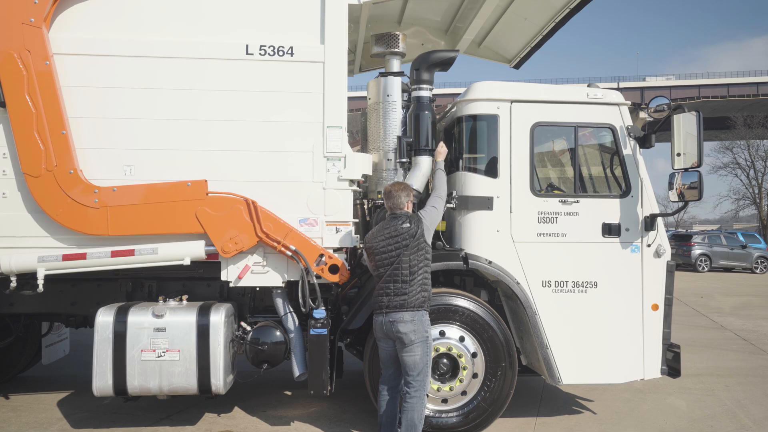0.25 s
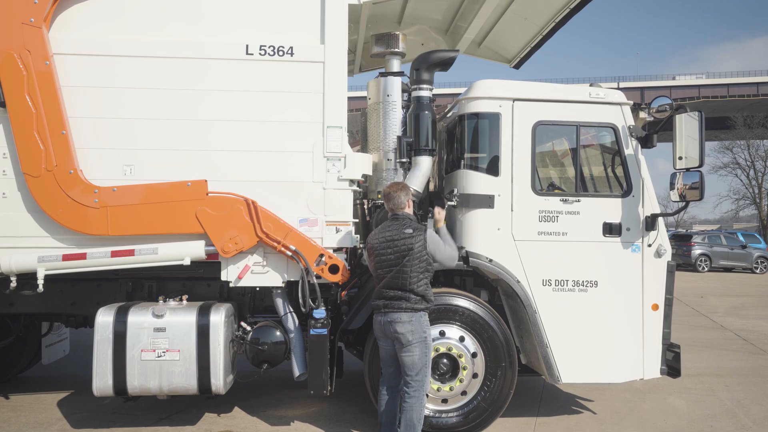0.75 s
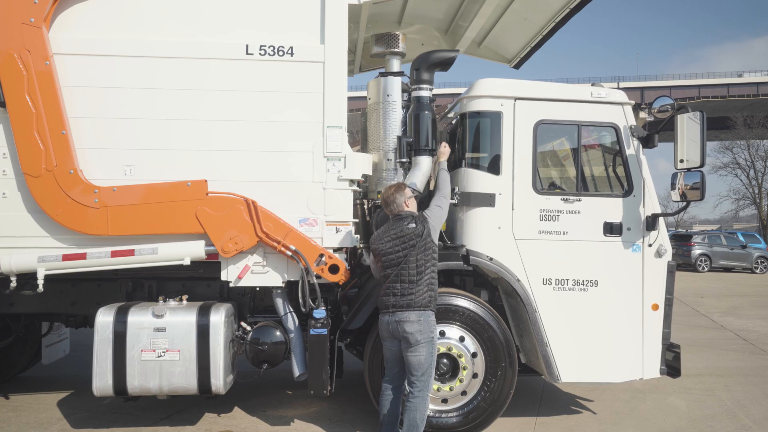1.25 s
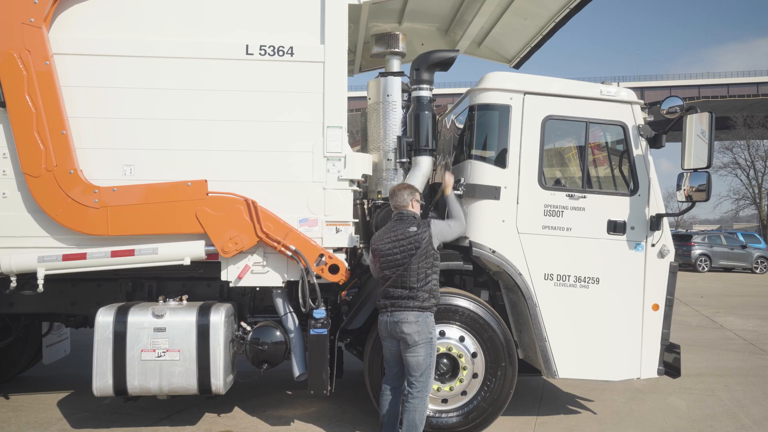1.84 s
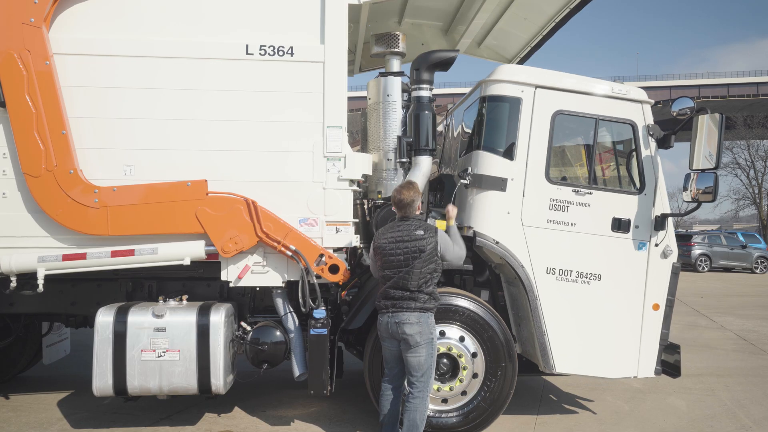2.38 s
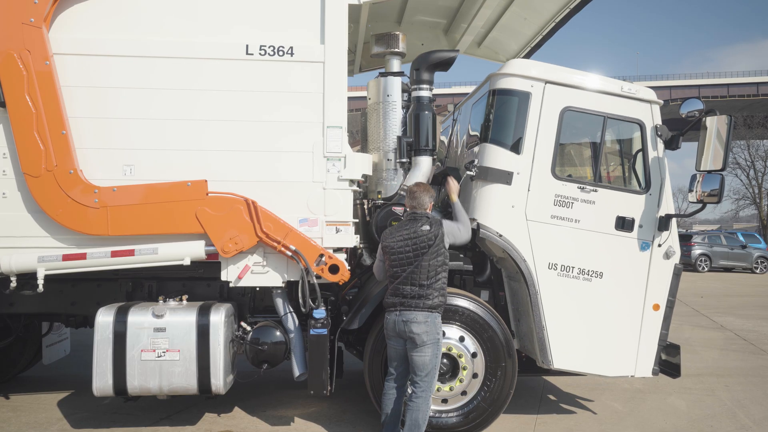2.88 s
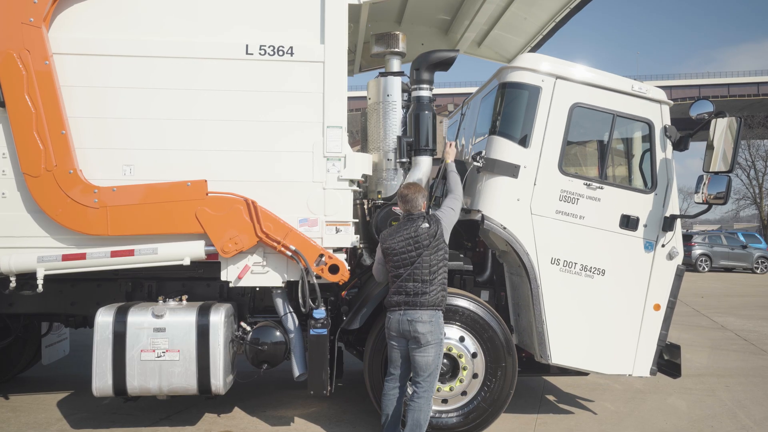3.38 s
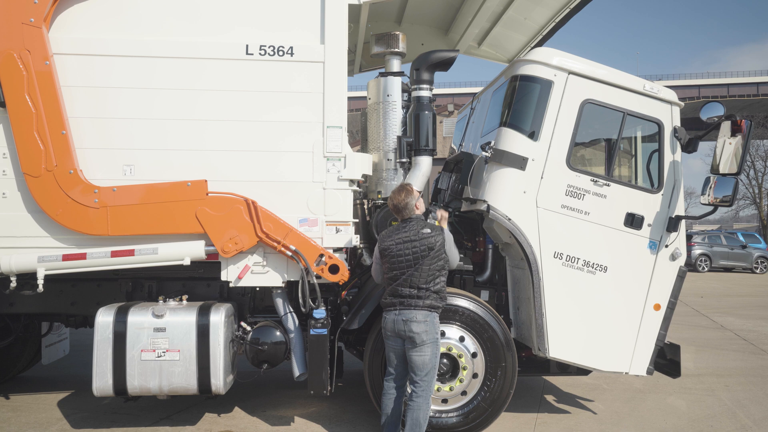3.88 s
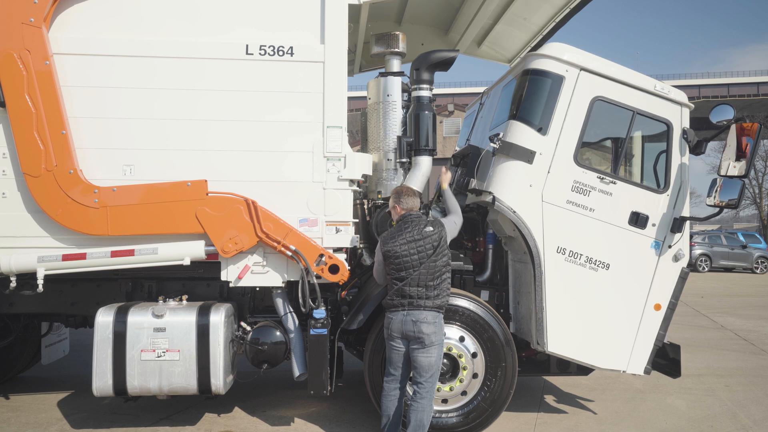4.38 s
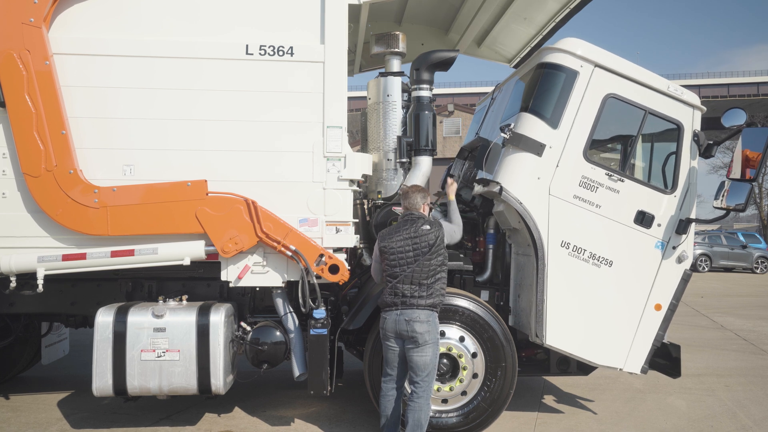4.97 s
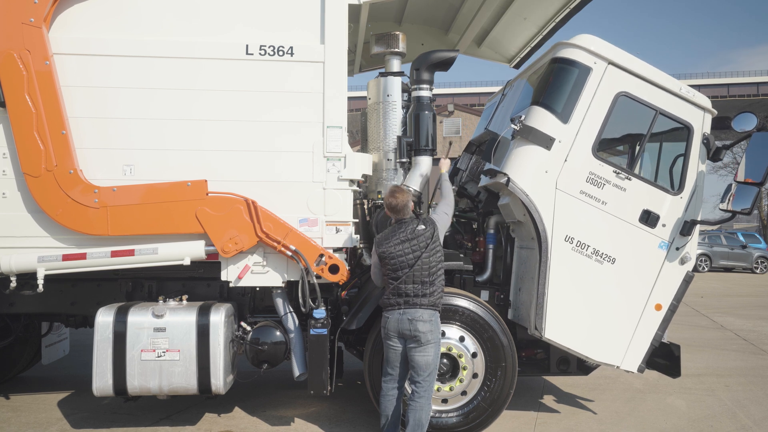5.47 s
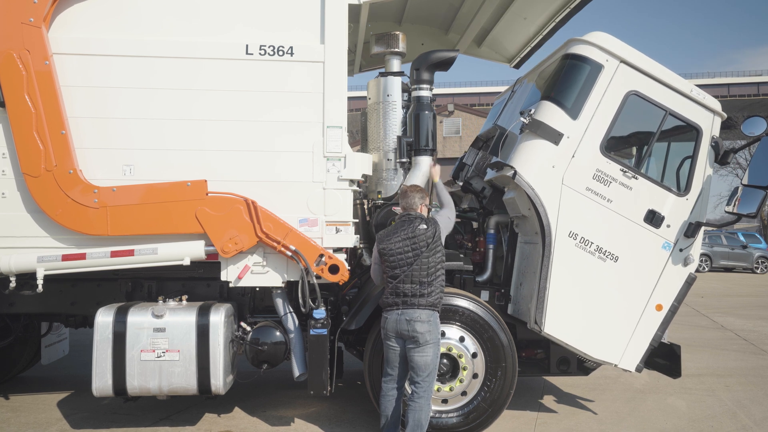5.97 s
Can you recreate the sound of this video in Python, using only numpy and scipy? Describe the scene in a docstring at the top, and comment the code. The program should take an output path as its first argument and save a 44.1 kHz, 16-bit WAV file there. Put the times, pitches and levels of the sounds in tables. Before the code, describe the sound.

A hydraulic hand pump on a truck is worked steadily for about six seconds in an open yard. Its steel lever strikes two stops in turn. The lower stop gives a snap with a hollow clang right at the start, then near 0.9, 1.6, 2.3, 3.0, 3.7, 4.3, 5.0 and 5.7 seconds. The upper stop gives a louder, brighter crack with a short rattle and a thump in the chassis near 0.4, 1.2, 2.0, 2.6, 3.3, 4.0, 4.6, 5.3 and 6.0 seconds. The pace quickens slightly over the first two seconds, then holds. Between knocks the loose lever clicks and scrapes in its socket, the linkage clinks, and the pivot makes tiny high squeaks. Oil hisses faintly with each stroke, with thin, high valve whistles near 1.9, 2.5 and 3.2 seconds. The knocks leave a faint, dull echo, and quiet distant traffic rumbles throughout.

```python
"""Hand pump tilting a truck cab

In an open yard, a steel lever knocks against its lower and upper stop in turn, each knock blooming
in the chassis. Between knocks the loose lever clicks and scrapes in its socket, the pivot squeaks,
the linkage clinks and oil hisses through the valves, over a distant traffic rumble."""
import sys
import numpy as np
from scipy import signal
from scipy.fft import rfft, irfft, next_fast_len
from scipy.io import wavfile

SR = 44100
rng = np.random.default_rng(int(sys.argv[2]) if len(sys.argv) > 2 else 0)


def to_wav(sig):
    """Store sig (one row per channel, or 1-D mono) as 16-bit WAV at the path in sys.argv[1].

    Samples outside -1..1 are clipped; the rate is SR.
    """
    pcm = np.clip(np.atleast_2d(sig), -1, 1) * 32767
    pcm = np.round(pcm).astype(np.int16)
    wavfile.write(sys.argv[1], SR, pcm.T)  # frames by channels


N = 274743
TIME = np.arange(N) / SR

# Lever hits on the lower stop; each layer trims these levels (time [s], crack [dB], frame thump [dB],
# panel clonk [dB], clang [dB], slip lead [s], slip [dB], seating delay [s])
LOWER_HITS = [(0.0175, -20.5, -55, -37.5, -25, 0.028, -70, 0.0045),
              (0.8566, -17.5, -77, -38, -28, 0.045, -31.5, 0.0033),
              (1.6326, -16, -48, -36.5, -24.5, 0.039, -29.5, 0.0021),
              (2.3305, -19.5, -35, -33.5, -28.5, 0.032, -26, 0.0016),
              (2.983, -21.5, -39, -28.5, -22.5, 0.035, -29, 0.018),
              (3.675, -25, -41, -39.5, -28.5, 0.043, -36, 0.009),
              (4.3125, -25, -39.5, -36.5, -24, 0.029, -29, 0.0126),
              (4.9801, -26, -38.5, -30, -23, 0.024, -29.5, 0.013),
              (5.6885, -23.5, -39.5, -35, -25, 0.033, -45, 0.018)]
# Lever hits on the upper stop, trimmed likewise (time [s], crack [dB], first touch [dB],
# frame thump [dB], panel clonk [dB], play click lead [s], play click [dB])
UPPER_HITS = [(0.4122, -13, -27.5, -32.5, -28, 0.057, -39), (1.2321, -16, -19, -33.5, -27.5, 0.058, -44.5),
              (1.9696, -12.5, -27.5, -26, -30.5, 0.045, -39.5),
              (2.643, -10.5, -22.5, -26.5, -29.5, 0.046, -42),
              (3.304, -14.5, -25.5, -25.5, -28.5, 0.044, -39.5),
              (3.976, -15, -28.5, -30.5, -28.5, 0.04, -39.5),
              (4.629, -15.5, -29.5, -27, -29.5, 0.0352, -42.5), (5.3184, -15, -29, -26, -29, 0.047, -41),
              (6.0257, -16, -31, -27.5, -31.5, 0.049, -43.5)]
# Chassis modes (pitch [Hz], upper-stop gain [dB], lower-stop gain [dB], t60 [s], build-up [s])
CHASSIS_MODES = [(162, -1.5, -14, 0.06, 0.01), (187, -12.5, -28, 0.33, 0.054),
                 (213.2, -1.5, -0.5, 0.11, 0.026), (241.4, -27.5, -6, 0.14, 0.045),
                 (309.2, -25.5, -13.5, 0.11, 0.14), (357.1, -14.5, -13, 0.11, 0.046),
                 (490.3, -5.5, 1, 0.16, 0.0086), (530.5, -17, -9.5, 0.17, 0.03),
                 (647.3, -9.5, -7, 0.16, 0.0044), (690.6, -21.5, -17.5, 0.21, 0.0054),
                 (779, -12.5, -12.5, 0.16, 0.0093), (889.4, -15.5, -13.5, 0.11, 0.023),
                 (1200, 3, -12.5, 0.057, 0.0029)]
# Resonances of the lever, its socket and the rattling linkage (centre [Hz], width [Hz], boost [dB])
LEVER_PEAKS = [(2630, 780, 5.5), (2926, 240, 2), (3240, 99, 1), (3930, 280, 3.5), (5010, 280, 3.5),
               (9200, 160, 7.5)]
SOCKET_PEAKS = [(5460, 120, 10), (8600, 230, 4.5), (10450, 290, 8.5), (11700, 390, 6)]
RATTLE_PEAKS = [(2560, 280, 7.5), (3180, 130, 14.5), (4870, 100, 4.5)]
# EQ curves of bright steel hits and of hollow panels (frequency [Hz], relative level [dB])
BRIGHT_EQ = [(700, -7.5), (1700, -7), (2600, -6), (4500, 1), (7300, 0.5), (8300, 0), (11000, 10.5),
             (13500, 5.5), (16000, 4)]
PANEL_EQ = [(150, -33.5), (230, 5), (520, 8), (850, -1.5), (1250, -1), (1600, -10.5), (5000, -20)]

GRAZE_S = 0.011   # the lever grazes the lower stop this long before it lands
BOUNCE_S = 0.0095   # each click of the play bounces once, this much later
CHINK_HZ = (8400, 13400)   # range in which the small joints ping


def from_db(db):
    """Decibels to gain."""
    return 10 ** (np.asarray(db) / 20)


def noise():
    """White noise, rms 1."""
    return rng.standard_normal(N)


def grit(spread_db):
    """Noise of many tiny contacts of uneven size, rms 1."""
    grains = noise() * from_db(spread_db * np.clip(noise(), -2, 2))
    return grains / grains.std()


def flicker(spread_db, per_s):
    """A gain that jumps about at random, so many times a second."""
    return from_db(spread_db * np.interp(TIME * per_s, np.arange(N), np.clip(noise(), -2, 2)))


def colour(x, eq, peaks=()):
    """Causal EQ: a smooth curve plus resonance peaks; white noise keeps its level."""
    size = 2 * next_fast_len(N // 2 + SR // 4)
    hz = np.maximum(np.arange(size // 2 + 1) * SR / size, 1)
    points = np.array(eq)
    db = np.interp(np.log(hz), np.log(points[:, 0]), points[:, 1])
    for centre, width, height in peaks:
        db = db + height / (1 + (2 * (hz - centre) / width) ** 2)
    gain = from_db(db)
    cepstrum = irfft(np.log(gain / np.sqrt(np.mean(gain ** 2))))
    cepstrum[1:size // 2] *= 2   # minimum phase: no ringing ahead of a hit
    cepstrum[size // 2 + 1:] = 0
    return irfft(rfft(x, size) * np.exp(rfft(cepstrum)))[:N]


def pitched_noise(hz, width_hz):
    """Noise in one resonance, rms 1."""
    radius = np.exp(-np.pi * width_hz / SR)
    band = signal.lfilter([1, 0, -1], [1, -2 * radius * np.cos(2 * np.pi * hz / SR), radius ** 2], noise())
    return band / band.std()


def swell(build_s, t60):
    """Half a second of an envelope that builds up and dies away, peak 1."""
    t = TIME[:SR // 2]
    shape = (1 - np.exp(-(t / build_s) ** 2)) * from_db(-60 * t / t60)
    return shape / shape.max()


def place(times, levels_db, shape):
    """One copy of a shape at each time, at its level."""
    out = np.zeros(N)
    for s, gain in zip(times, from_db(levels_db)):
        start = int(s * SR)
        if 0 <= start < N:
            out[start:start + len(shape)] += gain * shape[:N - start]
    return out


def strike_envelope(times, levels_db, build_s, t60):
    """The joint envelope of blows, each with its own build-up and decay."""
    blows = np.broadcast(times, levels_db, build_s, t60)
    return sum(place([s], [db], swell(build, decay)) for s, db, build, decay in blows)


def contact(times, body_db, treble_db, build_s, t60, split_hz=7500):
    """Steel chatters on steel: a gritty burst with separate body and treble levels."""
    force = grit(spread_db=3.5)
    body = signal.sosfilt(signal.butter(4, split_hz, "low", fs=SR, output="sos"), force)
    treble = signal.sosfilt(signal.butter(4, split_hz, "high", fs=SR, output="sos"), force)
    body *= strike_envelope(times, body_db, build_s, t60)
    treble *= strike_envelope(times, treble_db, build_s, t60)
    return body + treble


def bounces(times, levels_db, gap_s, loss_db, count, vary_db=2):
    """Each touch starts a short, uneven run of bounces: their times and levels."""
    bounce = np.arange(count)
    late, size = rng.standard_normal((2, len(times), count))
    s = times[:, None] + gap_s * (bounce + 0.18 * late * (bounce > 0))
    db = levels_db[:, None] - loss_db * bounce + vary_db * size
    return s.ravel(), db.ravel()


def steel(force, ring_db, t60=0.014, count=170):
    """Many fine modes of the lever and its linkage ring on after each contact."""
    t = TIME[:SR // 5]
    hz = np.linspace(1500, 15500, count) + rng.uniform(-100, 100, count)
    ring = rng.standard_normal(count) @ np.sin(2 * np.pi * hz[:, None] * t) * from_db(-60 * t / t60)
    return force + from_db(ring_db) * signal.fftconvolve(force, ring / np.linalg.norm(ring))[:N]


def pings(times, levels_db, low_hz, high_hz, t60, count=4):
    """The point of contact shifts, so each touch rings a few different modes."""
    t, shape = TIME[:SR // 2], swell(0.00057, t60)
    pitches = rng.uniform(low_hz, high_hz, (len(times), count))
    rings = (shape * np.sin(2 * np.pi * hz[:, None] * t).sum(0) for hz in pitches)
    return sum(place([s], [db], ring) for s, db, ring in zip(times, levels_db, rings))


def chassis(times, blows_db, modes_db, vary_db=3.5):
    """A blow spreads through the frame, so its modes bloom; load detunes them, the high ones most."""
    out, t = np.zeros(N), TIME[:SR // 2]
    for (hz, _, _, t60, build_s), mode_db in zip(CHASSIS_MODES, modes_db):
        register = np.searchsorted([280, 580], hz)   # blows_db holds low, mid and high levels
        shape = swell(build_s, t60)
        variations = rng.standard_normal((len(times), 3))
        for s, blow_db, (softer, shift, phase) in zip(times, blows_db[register], variations):
            detuned_hz = hz * (1 + 1.3e-5 * hz * shift)
            mode = shape * np.sin(2 * np.pi * (detuned_hz * t + phase))
            out += place([s], [blow_db + mode_db - vary_db * softer], mode)
    return out


def traffic(level_db=-50.5):
    """A steady bed of far-off traffic rumble."""
    # Rumble EQ (frequency [Hz], relative level [dB])
    rumble_eq = [(20, -22), (40, -9), (66, 3), (95, -3.5), (165, -2), (280, -12.5), (720, -17),
                 (1600, -29.5), (3000, -34.5), (7000, -41.5)]
    return from_db(level_db) * colour(noise(), rumble_eq)


def lower_stop(cushion_db_per_s=266):
    """Cushioned by oil, the lever lands and snaps into its seat; the frame gives a hollow clang."""
    # Landing EQ (frequency [Hz], relative level [dB])
    landing_eq = [(1000, -15.5), (1700, -5.5), (2100, -9), (2800, -5), (5500, -4.5), (6600, -16),
                  (8500, -4.5), (10500, 1), (16000, 1)]
    s, crack_db, thump_db, clonk_db, clang_db, _, slip_db, seat_s = np.transpose(LOWER_HITS)
    graze = contact(s - GRAZE_S, crack_db - 14, slip_db - 9, 0.0012, t60=0.04)
    # the longer the oil holds the lever back, the longer it grinds and the softer it seats
    landing = contact(s, crack_db + 2, crack_db - 10, 0.00067, t60=0.062 + 2.8 * seat_s)
    snap_db = crack_db + 7.5 - cushion_db_per_s * seat_s
    snap = contact(s + seat_s, snap_db, snap_db - 10, 0.00089 + seat_s / 10, t60=0.02)
    panels = colour(noise() * place(s, clang_db - 13, swell(0.014, 0.16)), PANEL_EQ, [(200, 310, -2.5)])
    frame = chassis(s + seat_s / 2, [thump_db, clonk_db + 1, clang_db - 7], np.array(CHASSIS_MODES)[:, 2])
    lever = colour(steel(graze + landing + snap, ring_db=-38), landing_eq, LEVER_PEAKS)
    return lever + panels + frame


def socket(loose_s=0.0364, judder_s=0.011):
    """The loose lever clicks, slips, scrapes and knocks in its socket."""
    # Stray mid-stroke clicks (time [s], body [dB], treble [dB])
    stray_clicks = [(3.5694, -30.5, -39), (5.603, -52, -48)]
    # Dull handle knocks (time [s], level [dB])
    handle_knocks = [(0.775, -46), (1.128, -40.5), (2.259, -43.5), (3.93, -45)]
    # Click and scrape EQ (frequency [Hz], relative level [dB])
    click_eq = [(1400, -9), (2700, 2), (5400, 1.5), (6600, -8.5), (9000, -3.5), (11500, 2), (16000, -0.5)]
    scrape_eq = [(400, -21.5), (510, 25), (700, 9), (1400, -6), (2700, -6), (5400, -2.5), (6600, -20),
                 (8600, -8.5), (16000, -7.5)]
    # before the upper stop, the play is taken up with a click and a bounce
    upper_s, *_, play_lead_s, play_db = np.transpose(UPPER_HITS)
    play = contact(upper_s - play_lead_s, play_db - 17, play_db, 0.002, t60=0.051)
    bounce = contact(upper_s - play_lead_s + BOUNCE_S, play_db - 11, play_db, 0.001, t60=0.13)
    # before the lower stop, the lever ticks loose, then slips in ringing jerks
    lower_s, *_, slip_lead_s, slip_db, _ = np.transpose(LOWER_HITS)
    slip_s = lower_s - slip_lead_s
    tick_s, tick_db = bounces(slip_s - loose_s, np.full(len(slip_s), -48), 0.016, loss_db=7.5, count=2)
    loose = contact(tick_s, tick_db, tick_db - 1, 0.0015, t60=0.038)
    jerk_s, jerk_db = bounces(slip_s, slip_db - 7, judder_s, loss_db=1.5, count=3)
    slip = contact(jerk_s, jerk_db - 7, jerk_db, 0.0008, t60=0.021)
    chirps = pings(jerk_s, jerk_db - 7, *CHINK_HZ, t60=0.035, count=3)
    strays = contact(*np.transpose(stray_clicks), 0.00091, t60=0.031)
    pressure = sum(np.interp(TIME - s, [-0.085, -0.005, 0.006], [0, 1, 0]) ** 2 for s in lower_s)
    friction = from_db(-46) * pressure * flicker(spread_db=0.5, per_s=300) * noise()
    scrape = colour(steel(friction, ring_db=-2, t60=0.072), scrape_eq, LEVER_PEAKS + SOCKET_PEAKS)
    thuds = noise() * place(*np.transpose(handle_knocks), swell(0.0013, 0.18))
    knocks = colour(thuds, PANEL_EQ, [(506, 63, 16.8), (1200, 250, 7.5)])
    clicks = steel(play + bounce + loose + slip + strays, ring_db=-9.5, t60=0.073)
    return colour(clicks, click_eq, LEVER_PEAKS + SOCKET_PEAKS) + chirps + scrape + knocks


def pivot(slip_hz=8720, graze_hz=8100):
    """Brief, rough stick-slip squeaks: a falling pair before each lower stop, and a few on their own."""
    # Lone squeaks and groans (time [s], pitch [Hz], level [dB], nominal length [s])
    lone_squeaks = [(0.547, 1280, -58.5, 0.093), (0.756, 2670, -50, 0.032), (1.526, 2660, -51.5, 0.033),
                    (3.268, 12900, -33.5, 0.012), (3.568, 12700, -32, 0.017), (4.905, 5400, -52.5, 0.025),
                    (5.616, 5500, -55, 0.015)]
    pairs = [(s - lead_s, hz, slip_db - 11, slip_lead_s / 2)
             for s, *_, slip_lead_s, slip_db, _ in LOWER_HITS
             for lead_s, hz in ((slip_lead_s, slip_hz), (GRAZE_S, graze_hz))]
    out = np.zeros(N)
    for s, hz, db, length in pairs + lone_squeaks:
        envelope = np.interp(TIME - s, [0, 0.003, length / 2, length * 1.3], [0, 1, 1, 0])
        out += from_db(db) * pitched_noise(hz, width_hz=170) * envelope
    return out


def linkage(clang_hz=(2513, 5584)):
    """Each stop rings the lever; loose joints clink and rattle, and ping as the play is taken up."""
    # Clinks of the loose joints (time [s], level [dB])
    joint_clinks = [(0.483, -43.5), (1.289, -39.5), (1.564, -40), (2.036, -36.5), (2.098, -41),
                    (2.26, -38.5), (2.7, -39), (2.931, -40), (3.365, -39.5), (4.05, -38.5), (4.688, -36),
                    (5.381, -37), (5.746, -45.5), (6.086, -34)]
    upper_s, *_, play_lead_s, play_db = np.transpose(UPPER_HITS)
    stop_s, crack_db = np.transpose([hit[:2] for hit in UPPER_HITS + LOWER_HITS])
    ring = pings(stop_s, crack_db - 21.5, *clang_hz, t60=0.05, count=10)
    play = pings(upper_s - play_lead_s + BOUNCE_S, play_db - 4.5, *CHINK_HZ, t60=0.046)
    s, db = bounces(*np.transpose(joint_clinks), gap_s=0.0091, loss_db=4, count=5)
    touches = contact(s, db - 4.5, db - 8.5, 0.001, t60=0.06)
    clinks = colour(touches, BRIGHT_EQ, LEVER_PEAKS + SOCKET_PEAKS + RATTLE_PEAKS)
    return ring + play + clinks + pings(s, db - 10.5, *CHINK_HZ, t60=0.039)


def flow(from_hits, to_hits, hiss, end_lead_s, fade_s=0.076):
    """Hiss envelope: oil flows from each stop until the lever slows before the opposite one."""
    ends = np.array([s - end_lead_s for s, *_ in to_hits] + [np.inf])
    ramps = (np.minimum(TIME - s, ends[ends > s][0] - TIME) / fade_s for s, *_ in from_hits)
    running = sum(np.clip(ramp, 0, 1) ** 2 for ramp in ramps)
    return running * from_db(np.interp(TIME, *np.transpose(hiss)))


def oil():
    """Oil sizzles during each stroke, and on some return strokes the inlet valve sings."""
    # Hiss as oil is drawn in and pressed out (time [s], level [dB])
    draw_hiss = [(0.201, -61.5), (.29, -70), (.9, -64), (1.08, -57), (1.12, -69), (1.799, -66), (3.15, -70),
                 (4.45, -59.5), (5.149, -57.5), (5.8, -63.5), (5.9, -68)]
    press_hiss = [(.53, -60.5), (.68, -55), (1.4, -57), (2.15, -53), (2.8, -58), (3.45, -64.5),
                  (4.1, -59.5), (4.75, -60), (5.45, -65), (6.1, -57.5)]
    # Hiss EQ (frequency [Hz], relative level [dB])
    hiss_eq = [(1500, -6.5), (3000, 0.5), (5200, 4.5), (6600, 1), (10500, 7.5), (16000, -1)]
    # Swells of the singing inlet valve (peak time [s], level [dB], half length [s])
    valve_swells = [(1.85, -55.5, 0.042), (2.525, -48, 0.028), (3.193, -50.5, 0.03)]
    sizzle = grit(spread_db=5) * flicker(spread_db=2.5, per_s=150)
    drawing = flow(LOWER_HITS, UPPER_HITS, draw_hiss, end_lead_s=0.086)
    pressing = flow(UPPER_HITS, LOWER_HITS, press_hiss, end_lead_s=0.096)
    drawn = colour(drawing * sizzle, hiss_eq, [(6750, 14000, -16)])   # a wide scoop sounds hollower
    pressed = colour(pressing * sizzle, hiss_eq, LEVER_PEAKS)
    opening = sum(from_db(db) * np.exp(-((TIME - s) / half) ** 2) for s, db, half in valve_swells)
    singing = colour(opening * sizzle, [(7800, -27), (10800, -2.5), (13800, -24.5)])
    return drawn + pressed + singing


def check_valve():
    """The check valve snaps shut with a dry tick."""
    # Valve closures (time [s], level [dB])
    closures = [(0.2277, -40.5), (2.12, -44), (2.179, -40.5)]
    ticks = noise() * place(*np.transpose(closures), swell(0.00044, 0.0051))
    return colour(ticks, [(2500, -20), (5500, 8), (16000, -5)])


def upper_stop(touch_lead_s=0.00782, rebound_s=0.0155):
    """A light first touch, the full crack, a scattered rattle as the lever rebounds, and a deep thump."""
    s, crack_db, touch_db, thump_db, clonk_db, _, _ = np.transpose(UPPER_HITS)
    touch = contact(s - touch_lead_s, touch_db + 3.5, touch_db - 5.5, 0.00054, t60=0.075)
    crack = contact(s, crack_db + 0.44, crack_db - 10, 0.00028, t60=0.041)
    bounce_s, bounce_db = bounces(s + rebound_s, crack_db - 20, 0.005, loss_db=1.5, count=6, vary_db=6.5)
    rebound = contact(bounce_s, bounce_db + 1.5, bounce_db, 0.00021, t60=0.018)
    panels = colour(noise() * place(s, clonk_db - 3, swell(0.0058, 0.17)), PANEL_EQ)
    frame = chassis(s, [thump_db - 0.5, clonk_db, crack_db - 19], np.array(CHASSIS_MODES)[:, 1])
    rattle = colour(steel(rebound, ring_db=-10.5, t60=0.06), BRIGHT_EQ, LEVER_PEAKS + RATTLE_PEAKS)
    lever = colour(steel(touch + crack, ring_db=-9), BRIGHT_EQ, LEVER_PEAKS)
    return lever + rattle + panels + frame


def yard(x, echo_db=-25, t60=0.27):
    """Walls and parked trucks scatter a faint, dull tail."""
    tail = swell(0.018, t60) * rng.standard_normal(SR // 2)
    wet = signal.fftconvolve(x, tail / np.linalg.norm(tail))[:N]
    return from_db(echo_db) * colour(wet, [(100, 19), (600, 2.5), (3000, -2.5), (16000, -15.5)])


def scene():
    """Mono mix: the pump's metalwork and its yard echo, with oil hiss and traffic underneath."""
    pump = upper_stop() + lower_stop() + socket() + linkage() + pivot() + check_valve()
    return (pump + yard(pump) + oil() + traffic())[None]


def record(dry, cutoff_hz=16050):
    """A steep low-pass trims the very top."""
    return signal.sosfilt(signal.ellip(12, 0.1, 80, cutoff_hz, fs=SR, output="sos"), dry)


dry = scene()
out = record(dry)
to_wav(out)
```